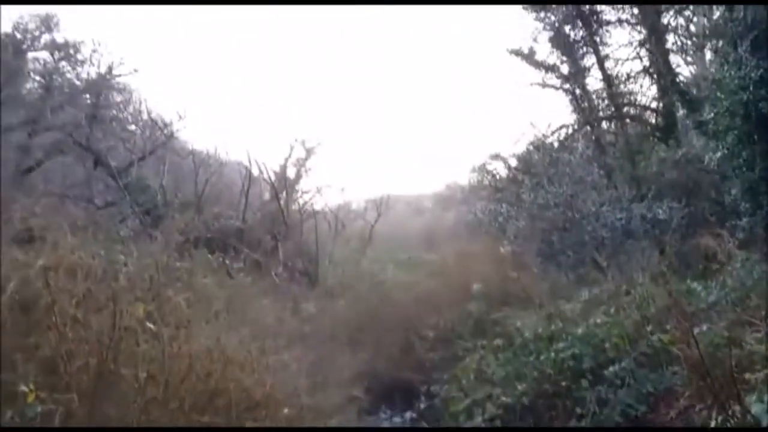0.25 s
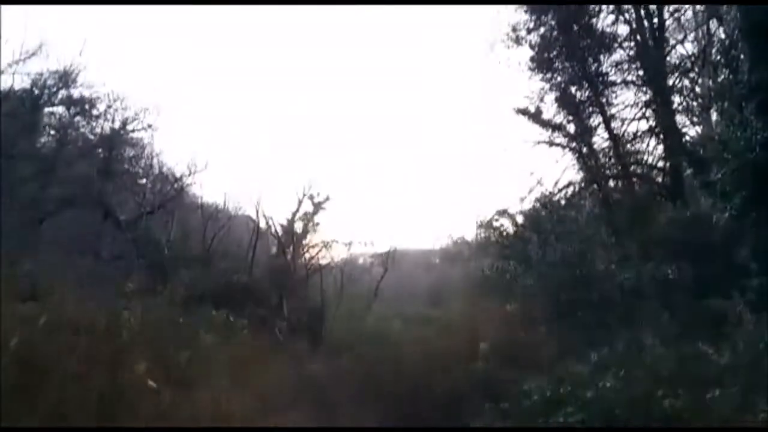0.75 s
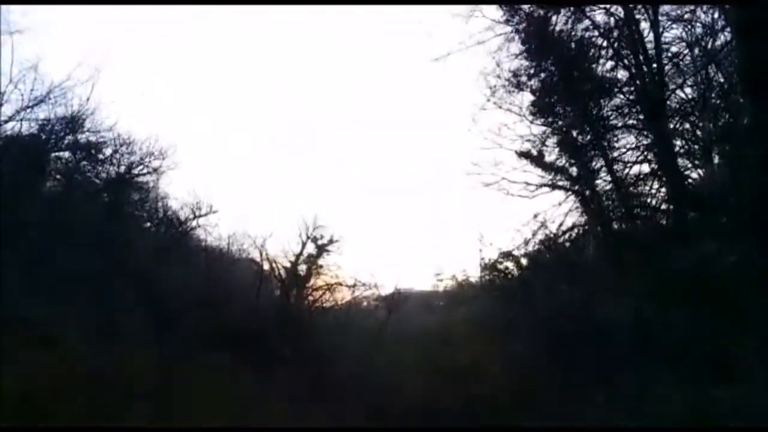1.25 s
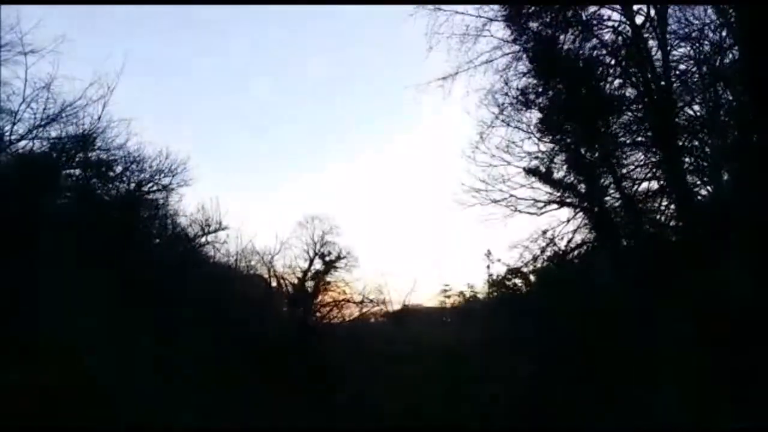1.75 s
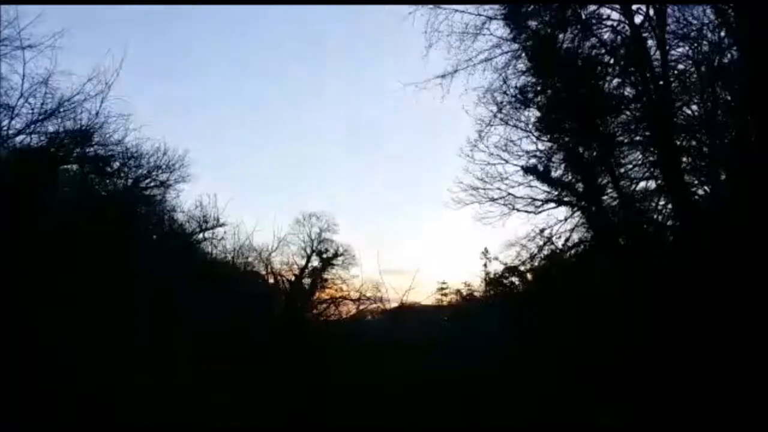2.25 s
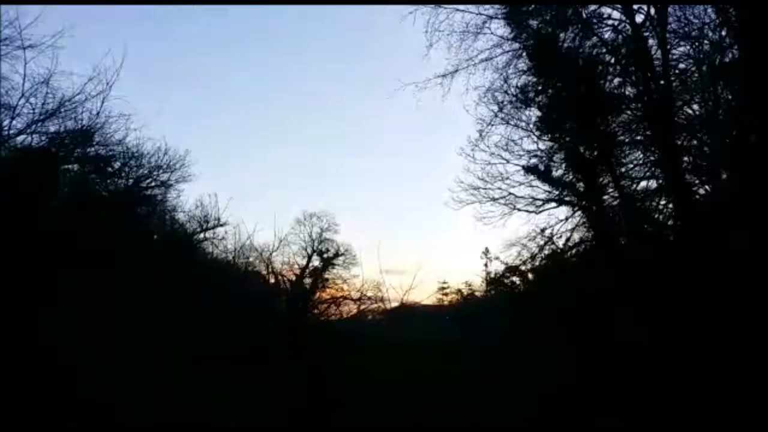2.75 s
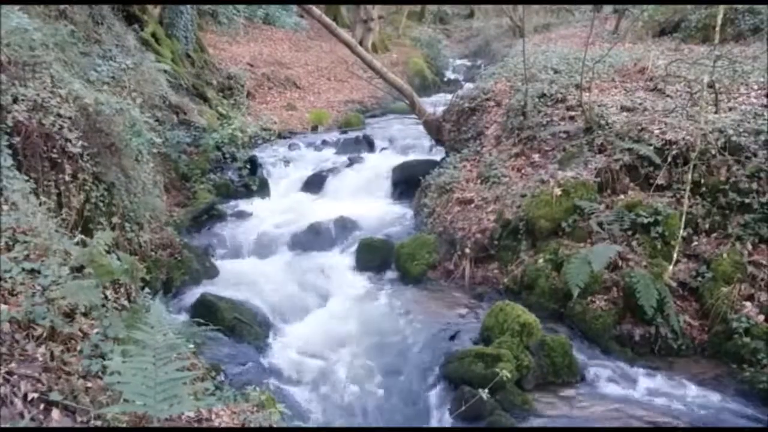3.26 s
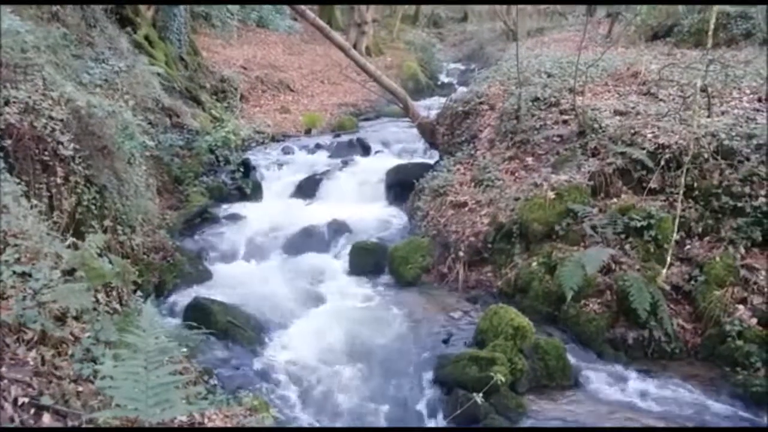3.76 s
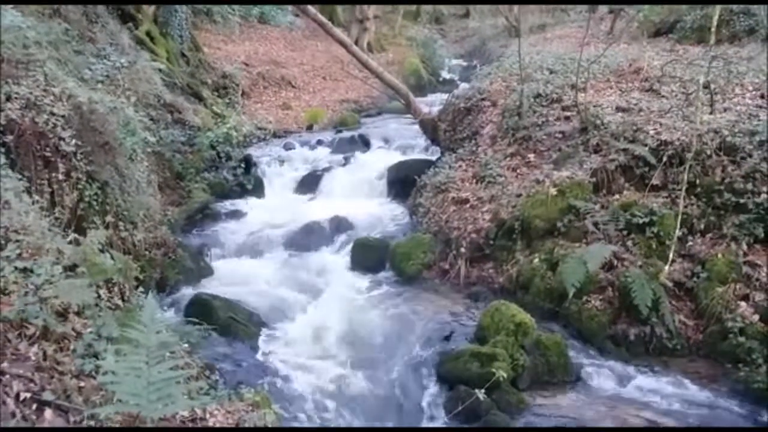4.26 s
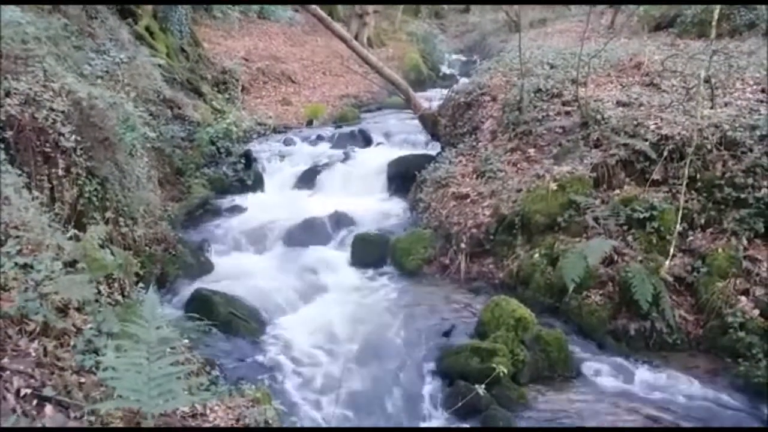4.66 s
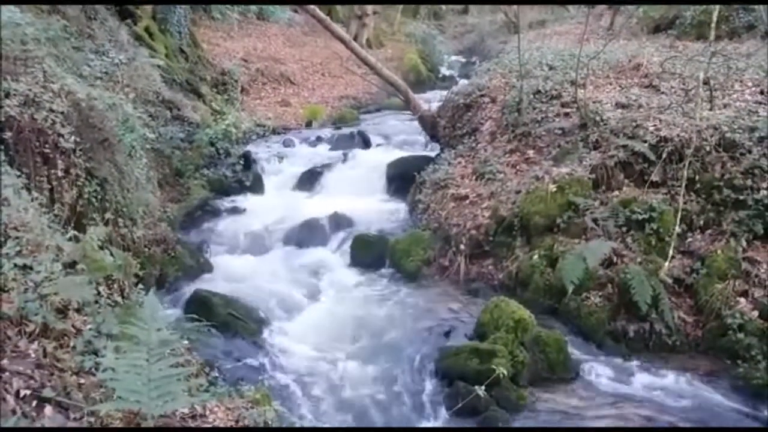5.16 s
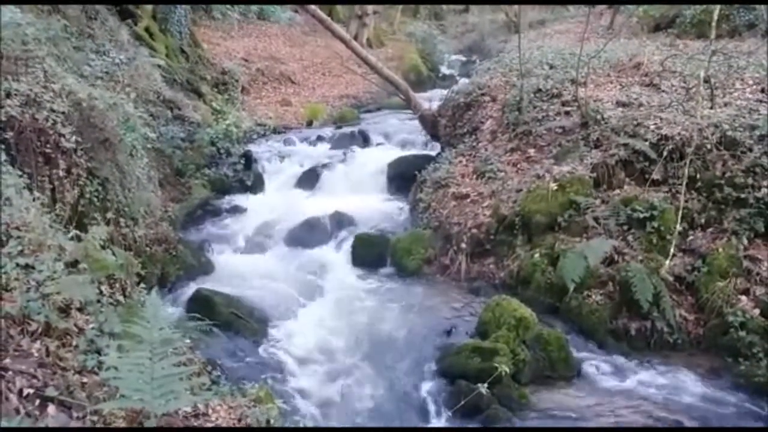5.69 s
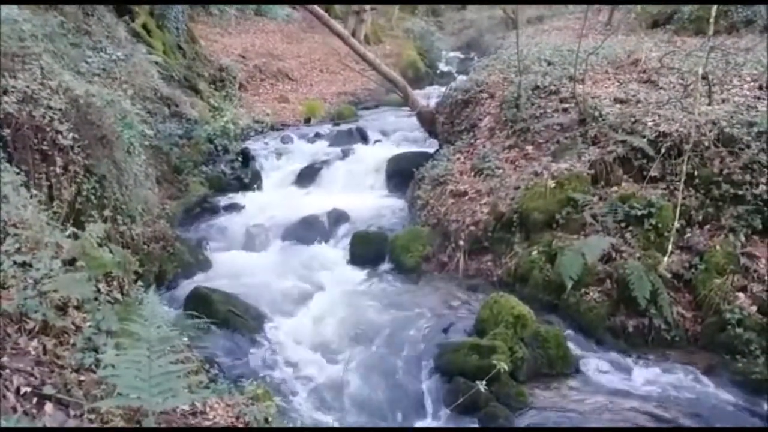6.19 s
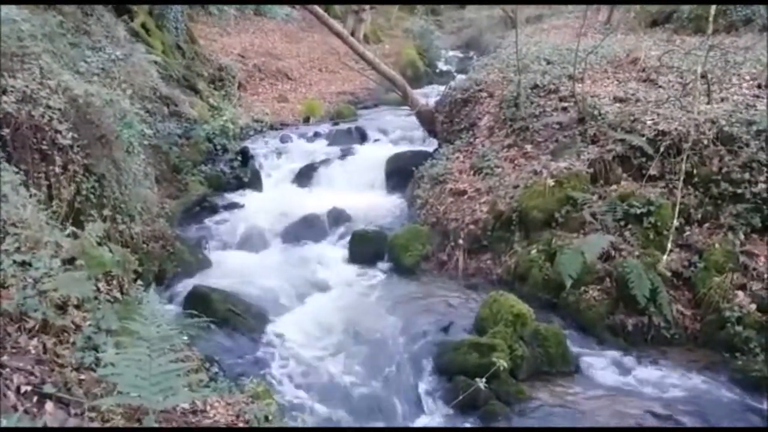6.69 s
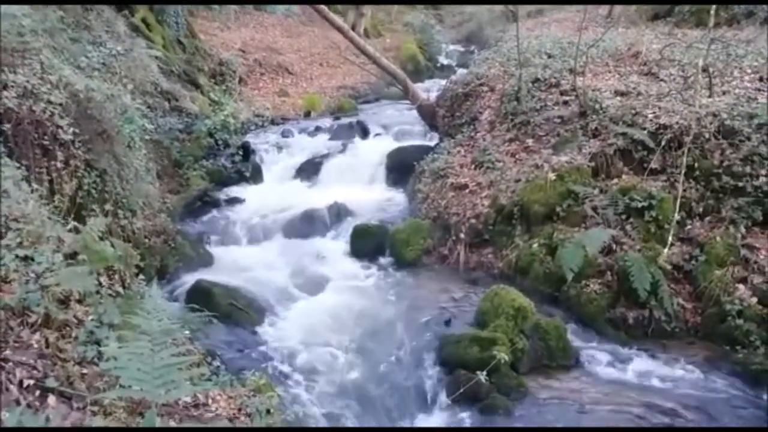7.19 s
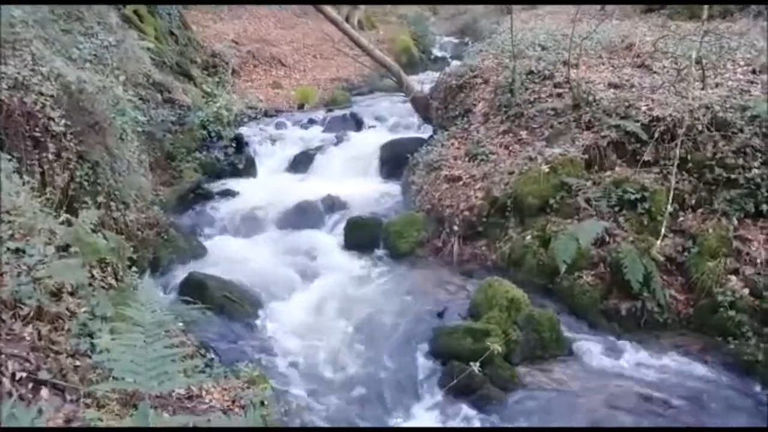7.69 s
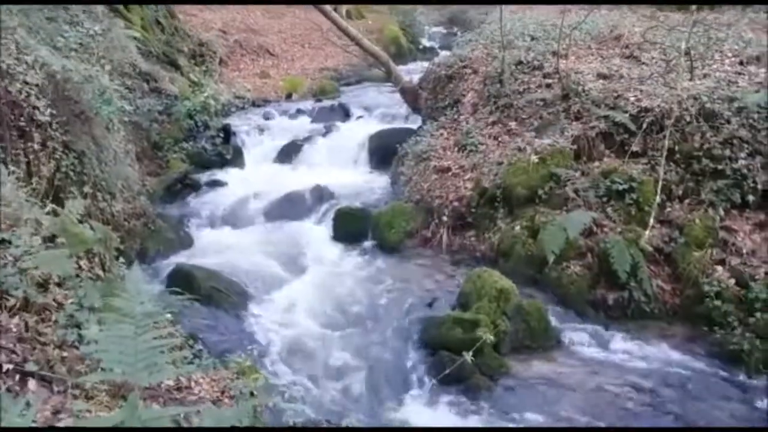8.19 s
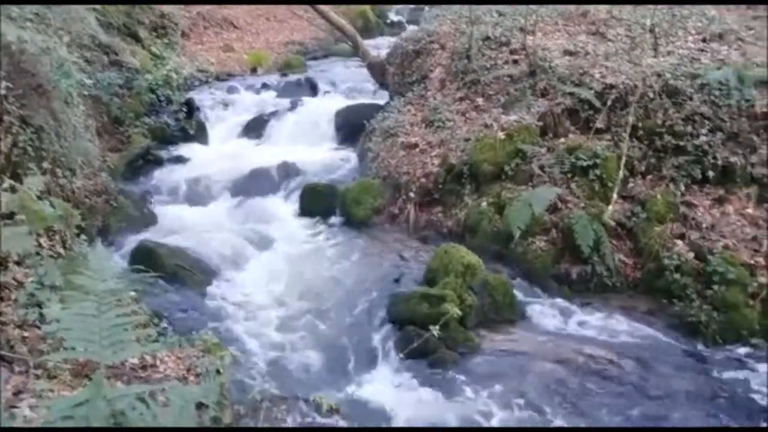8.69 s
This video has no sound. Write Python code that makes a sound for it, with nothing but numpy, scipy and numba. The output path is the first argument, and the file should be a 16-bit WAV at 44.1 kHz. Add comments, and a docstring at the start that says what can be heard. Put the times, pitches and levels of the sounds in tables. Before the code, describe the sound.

A brook behind brambles rushes and gurgles steadily, its left side covered and bassy, its right clearer. Three low finger bumps hit the left microphone early on. The water cuts off sharply, silence lasts a fraction of a second, then a nearby rocky cascade fades in quickly, full and bright, with rumbling, gulping, babbling and fizzing spray until the end.

```python
"""Woodland stream heard from two places through the two microphone ports of a hand-held phone.
First a brook behind brambles, the left port covered and bumped by a finger; then, after a short
silence, white water on rocks fades in. Both waters are swarms of ringing air bubbles (damped sines)
over a wash of flickering noise, coloured per port; lone air pockets glug on top."""
import sys
import numpy as np
from scipy import signal
from scipy.fft import rfft, irfft
from scipy.io import wavfile
from scipy.ndimage import uniform_filter1d
from numba import njit

SR = 44100
rng = np.random.default_rng(int(sys.argv[2]) if len(sys.argv) > 2 else 0)


def master(y):
    """Save y as 16-bit WAV."""
    cut = np.clip(np.atleast_2d(y).T, -1, 1)
    pcm = np.round(cut * 32767)  # scale
    wavfile.write(sys.argv[1], SR, pcm.astype(np.int16))


N = 394254
TIME_S = np.arange(N) / SR
FREQS_HZ = np.maximum(np.arange(N // 2 + 1) * SR / N, 1)
TOP_HZ = 14600
BROOK_CUT_S, BROOK_CUT_FADE_S = 2.936, 0.027  # fade: time to fall 60 dB
FADE_START_S, FADE_END_S, FADE_POWER = 3.277, 3.57, 0.96
GULP_SWELL_WIDTH_S, SPRAY_SWELL_WIDTH_S = 0.027, 0.022


def undb(db):
    """Decibels to gain."""
    return 10 ** (np.asarray(db) / 20)


def unit(x):
    """Scale to rms 1."""
    return x / np.sqrt(np.mean(x ** 2))


def butter(x, order, hz, kind):
    """Butterworth filter."""
    return signal.sosfilt(signal.butter(order, hz, kind, fs=SR, output="sos"), x)


def walk(rate_hz):
    """Random levels held 1 / rate_hz seconds and slewed, rms 1."""
    hold = max(int(SR / rate_hz), 2)
    steps = rng.standard_normal(N // hold + 2)
    slewed = uniform_filter1d(np.repeat(steps, hold), hold)
    return unit(slewed[rng.integers(hold):][:N])


def swells(rows, width_s):
    """Gain of a layer that swells briefly at each (s, dB) row."""
    return undb(sum(db * np.exp(-((TIME_S - s) / width_s) ** 2) for s, db in rows))


def surge(slow_db, quick_db):
    """The flow heaves slowly and slops quickly, moving its wash and bubbles together."""
    return undb(slow_db * walk(5.5) + quick_db * walk(45))


def brighten(x, above_hz, db_per_s):
    """The treble opens steadily until the brook is cut, while the phone tilts up."""
    treble = irfft(rfft(x) / (1 + (above_hz / FREQS_HZ) ** 8), N)
    tilt_db = db_per_s * (np.minimum(TIME_S, BROOK_CUT_S) - BROOK_CUT_S / 2)
    return x + treble * (undb(tilt_db) - 1)


def colour(x, points):
    """Shape a white sound of rms 1 to the (Hz, dB per Hz) points; a port passes no steady pressure."""
    hz, db = np.transpose(points)
    level_db = np.interp(np.log(FREQS_HZ), np.log(hz), db)
    gain = undb(level_db) * np.sqrt(SR / 2)
    low_cut = np.minimum(FREQS_HZ / hz[0], 1) ** 2
    return irfft(rfft(x) * gain * low_cut, N)


def wash(lag_ms, alike_hz, direct, flicker_db, flicker_rate):
    """Countless far splashes merge into noise with flickering octaves; ports agree most on long waves."""
    shared, left, right = rfft(rng.standard_normal((3, N)))
    alike = np.clip(direct + (.95 - direct) / (1 + (FREQS_HZ / alike_hz) ** 2), 0, 1)
    delay = np.exp(-2j * np.pi * FREQS_HZ * lag_ms / 1000)
    common = np.sqrt(alike) * np.array([shared * delay, shared])
    ports = common + np.sqrt(1 - alike) * np.array([left, right])
    octave = np.log2(np.clip(FREQS_HZ, TOP_HZ / 128, TOP_HZ) * 128 / TOP_HZ)
    out = 0
    for k in range(8):
        band = irfft(ports * np.maximum(1 - abs(octave - k), 0), N)
        out = out + band * undb(flicker_db * walk(flicker_rate))
    return unit(out)


@njit
def ring(start, hz, cycles, size, rise):
    """Sum of damped sines that fall 50 dB in their number of cycles while the pitch rises by a share."""
    out = np.zeros(N)
    for k in range(len(start)):
        length = cycles[k] * SR / hz[k]
        first = int(start[k]) + 1
        turn = 2 * np.pi * hz[k] / SR
        step = np.exp(1j * turn - np.log(316) / length)
        glide = np.exp(1j * turn * rise / length)
        z = size[k] * np.exp(1j * turn * (first - start[k]))
        for i in range(max(first, 0), min(first + int(length), N)):
            out[i] += z.imag
            z *= step
            step *= glide
    return out


def bubbles(per_s, low_hz, high_hz, cycles, rise, scatter_db, lag_ms, spread_ms):
    """Trapped air rings once per bubble; small ones outnumber large, each has its own direction."""
    when, place, loud, life, side = rng.random((int(per_s * N / SR), 5)).T
    low_root, high_root = np.sqrt(low_hz), np.sqrt(min(high_hz, TOP_HZ))
    hz = (low_root + place * (high_root - low_root)) ** 2
    # equal power per Hz on average, a few bubbles well above the crowd
    size = hz ** .75 * undb(-scatter_db * np.log(np.maximum(loud, .01)))
    left_late_s = (lag_ms + spread_ms * (2 * side - 1)) / 1000
    starts = (when * N + left_late_s * SR, when * N)
    swarm = np.array([ring(s, hz, cycles * (.5 + life), size, float(rise)) for s in starts])
    # soft onset: no thud below the largest bubble
    swarm = butter(swarm, 2, low_hz / 2, "high")
    # as strong per Hz as white noise of rms 1
    return unit(swarm) * np.sqrt((high_hz - low_hz) / (SR / 2))


# Brook colour at the covered left port. Each row: frequency in Hz, level in dB per Hz.
BROOK_LEFT_COLOUR = [(15, -90), (30, -85.5), (55, -64), (100, -58.5), (150, -53.5), (240, -58), (320, -58),
                     (480, -62.5), (1200, -76), (2000, -81), (4000, -85.5), (5500, -93.5), (6500, -99),
                     (7100, -109), (8100, -108), (8800, -100.5), (11000, -96.5), (14000, -87)]
# Brook colour at the open right port. Each row: frequency in Hz, level in dB per Hz.
BROOK_RIGHT_COLOUR = [(15, -77), (30, -83), (70, -65.5), (145, -57), (220, -57), (330, -53.5), (450, -58),
                      (1500, -58), (2050, -61), (2450, -67.5), (2750, -75.5), (3100, -72.5), (3750, -66.5),
                      (4600, -68.5), (6000, -77), (7000, -71), (8000, -65.5), (9500, -72.5), (14000, -83)]
# Moment when the fine mist is louder. Each row: time in seconds, swell in dB.
MIST_SWELLS = [(1.94, 18.5)]


def brook():
    """Water gurgles in a narrow bed and spits spray; the covered left port hears mostly its bass."""
    water = wash(lag_ms=0.046, alike_hz=1010, direct=0.055, flicker_db=0.8, flicker_rate=22)
    gurgle = bubbles(per_s=2000, low_hz=141.5, high_hz=2495, cycles=41, rise=0.046,
                     scatter_db=1.4, lag_ms=0.24, spread_ms=0.39)
    spray = bubbles(per_s=7000, low_hz=2460, high_hz=13800, cycles=42, rise=0.04,
                    scatter_db=1.5, lag_ms=0, spread_ms=0.4)
    mist = bubbles(per_s=3000, low_hz=7400, high_hz=10500, cycles=55, rise=0.04,
                   scatter_db=2.0, lag_ms=0, spread_ms=0.4)
    mist = mist * swells(MIST_SWELLS, SPRAY_SWELL_WIDTH_S)
    water = undb(-2.0) * water + undb(-4.5) * gurgle + undb(-3.5) * spray + undb(-14.5) * mist
    water = water * surge(slow_db=0.0, quick_db=0.5)
    water = brighten(water, above_hz=6500, db_per_s=0.5)
    return np.array([colour(water[0], BROOK_LEFT_COLOUR), colour(water[1], BROOK_RIGHT_COLOUR)])


# Finger bumps on the left port. Each row: time of peak pressure in seconds, pressure peak in dB,
# pitch of the relaxing swing in Hz, level of the skin's rub in dB (rms, at its height).
FINGER_BUMPS = [(.3785, -4.5, 122, -37), (1.2347, -15.5, 100, -44), (1.4727, -13, 88, -25)]


def finger(cycles, press):
    """A fingertip rubs the left port and squeezes its air: a swing pressed faster than it relaxes."""
    rub_lead_s, rub_width_s, rub_band_hz = 0.002, 0.0025, [348, 800]
    out = np.zeros((2, N))
    skin = unit(butter(rng.standard_normal(N), 2, rub_band_hz, "band"))
    for s, db, hz, rub_db in FINGER_BUMPS:
        turns = (TIME_S - s) * hz * np.where(TIME_S < s, press, 1)
        swing = np.cos(2 * np.pi * turns) * np.exp(-(turns / cycles) ** 2)
        rub = skin * np.exp(-((TIME_S - s + rub_lead_s) / rub_width_s) ** 2)
        out[0] += undb(db) * swing + undb(rub_db) * rub
    return out


# Lone air pockets. Each row: start in seconds, left-port level in dB, starting pitch in Hz,
# length of ring in cycles of that pitch.
AIR_POCKETS = [(1.812, -26, 323, 120), (2.825, -24, 375, 65), (4.532, -20, 308, 24),
               (5.912, -25.5, 200, 24), (6.38, -24, 210, 26), (6.678, -24, 147, 30),
               (6.732, -26, 1005, 110), (6.924, -15.5, 290, 15), (7.835, -25, 335, 60),
               (8.325, -22, 210, 47)]


def glugs(rise):
    """An air pocket forms softly, rings alone, rises in pitch as it surfaces; the left port is nearer."""
    s, db, hz, cycles = np.transpose(AIR_POCKETS)
    pockets = ring(s * SR, hz * 1., cycles * 1., undb(db), float(rise))
    pockets = butter(pockets, 3, 110, "high")
    return np.array([pockets, undb(-4.5) * pockets])


# Falls colour at the left port; the bright bands are the port's own resonances.
# Each row: frequency in Hz, level in dB per Hz.
FALLS_LEFT_COLOUR = [(15, -80), (40, -80), (90, -55.5), (180, -55), (270, -53), (400, -55), (530, -58),
                     (680, -56), (1020, -55.3), (1180, -60.5), (1700, -58.5), (2500, -61.5), (2800, -67),
                     (3150, -67), (3650, -62.5), (4500, -63.5), (5300, -59.5), (5850, -65), (6450, -59.5),
                     (7200, -67.5), (9000, -72.5), (10300, -73), (12500, -74), (14000, -76)]
# Falls colour at the right port, duller in the hiss, with a resonance higher up.
# Each row: frequency in Hz, level in dB per Hz.
FALLS_RIGHT_COLOUR = [(15, -86), (40, -80), (95, -60), (180, -58.5), (260, -56), (380, -58), (500, -62),
                      (680, -59), (1700, -59.5), (2300, -62.5), (2800, -67.5), (3600, -69), (4900, -68),
                      (6700, -72), (7600, -69), (8300, -64), (9000, -67.5), (12000, -73.5), (14000, -83)]
# Moments when the low gulping is louder. Each row: time in seconds, swell in dB.
GULP_SWELLS = [(4.54, 4), (4.726, 6), (5.043, 7), (5.513, 3.5), (5.925, 3), (6.241, 6.5), (6.89, 3),
               (7.178, 5), (7.849, 5), (8.68, 2)]
# Moments when the bright spray of drops is louder. Each row: time in seconds, swell in dB.
SPRAY_SWELLS = [(3.742, 10), (3.978, 7.5), (4.795, 13), (5.043, 11), (6.304, 9), (7.215, 7.5), (7.494, 8),
                (7.867, 11), (8.065, 7)]


def falls():
    """Water plunges over rocks: big air pockets rumble and gulp, smaller ones babble, spray fizzes."""
    water = wash(lag_ms=0.371, alike_hz=735, direct=0.12, flicker_db=0.5, flicker_rate=28)
    rumble = bubbles(per_s=260, low_hz=94.9, high_hz=240, cycles=19.3, rise=0.095,
                     scatter_db=1.4, lag_ms=0.088, spread_ms=0.22)
    gulps = bubbles(per_s=220, low_hz=234, high_hz=440, cycles=26.4, rise=0.12,
                    scatter_db=1.45, lag_ms=0.088, spread_ms=0.21)
    gurgles = bubbles(per_s=480, low_hz=560, high_hz=1060, cycles=60, rise=0.054,
                      scatter_db=1.65, lag_ms=0.04, spread_ms=0.15)
    babble = bubbles(per_s=900, low_hz=452, high_hz=2593, cycles=60, rise=0.04,
                     scatter_db=1.3, lag_ms=0.19, spread_ms=0.27)
    spray = bubbles(per_s=3200, low_hz=2589, high_hz=14000, cycles=72, rise=0.035,
                    scatter_db=0.8, lag_ms=0.197, spread_ms=0.297)
    drops = bubbles(per_s=1800, low_hz=4310, high_hz=6130, cycles=51, rise=0.05,
                    scatter_db=3.0, lag_ms=0.3, spread_ms=0.22)
    patter = bubbles(per_s=160, low_hz=1200, high_hz=6500, cycles=14, rise=0.05,
                     scatter_db=2.2, lag_ms=0.3, spread_ms=0.21)
    gulps = gulps * swells(GULP_SWELLS, GULP_SWELL_WIDTH_S)
    drops = drops * swells(SPRAY_SWELLS, SPRAY_SWELL_WIDTH_S) * undb(1.5 * walk(14))
    water = undb(-2.5) * water + undb(-3.5) * rumble + undb(-3.5) * gulps
    water = water + undb(-7.2) * gurgles + undb(-6.0) * babble
    water = water + undb(-5.5) * spray + undb(-8) * drops + undb(-14.0) * patter
    water = water * surge(slow_db=0.18, quick_db=0.29)
    return np.array([colour(water[0], FALLS_LEFT_COLOUR), colour(water[1], FALLS_RIGHT_COLOUR)])


def scene():
    """The brook is cut off abruptly; after a silence the falls fade in."""
    brook_on = undb(-60 * np.maximum(TIME_S - BROOK_CUT_S, 0) / BROOK_CUT_FADE_S)
    falls_on = np.clip((TIME_S - FADE_START_S) / (FADE_END_S - FADE_START_S), 0, 1) ** FADE_POWER
    water = brook() * brook_on + falls() * falls_on
    pockets = glugs(rise=0.17) * (brook_on + falls_on)
    return water + pockets + finger(cycles=0.52, press=2.04)


def record(dry):
    """The phone cuts steeply above TOP_HZ."""
    return signal.sosfilt(signal.ellip(12, .1, 80, TOP_HZ, fs=SR, output="sos"), dry)


dry = scene()
out = record(dry)
master(out)
```